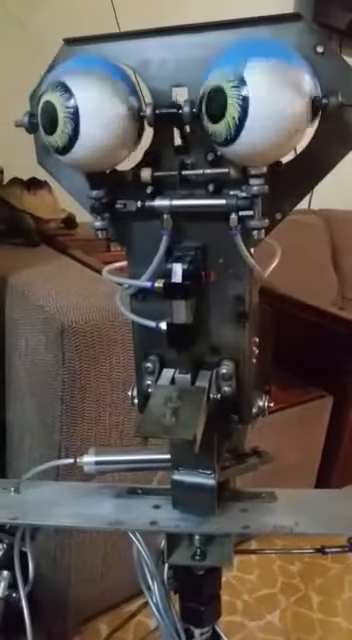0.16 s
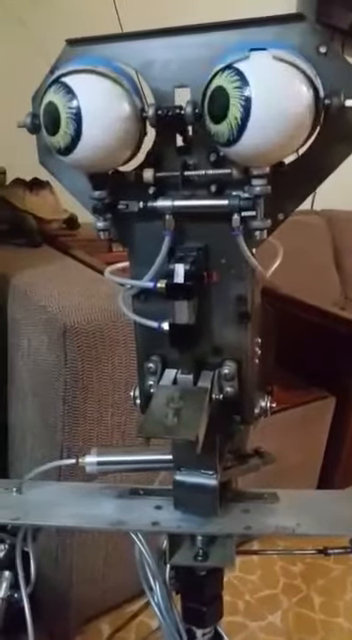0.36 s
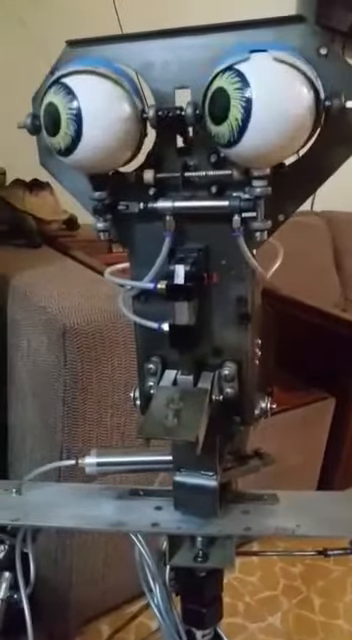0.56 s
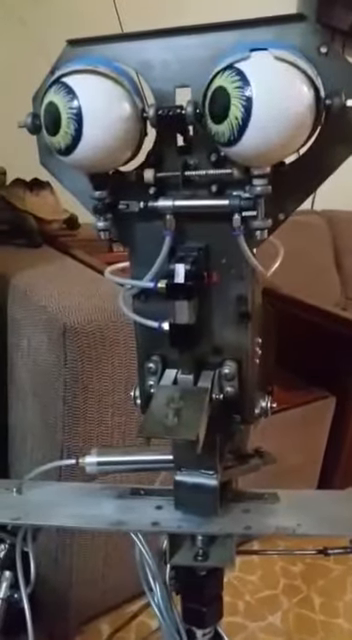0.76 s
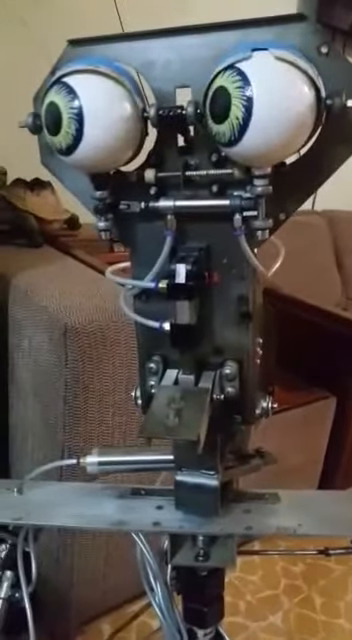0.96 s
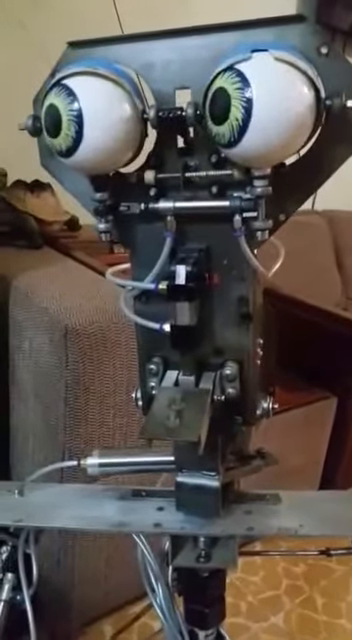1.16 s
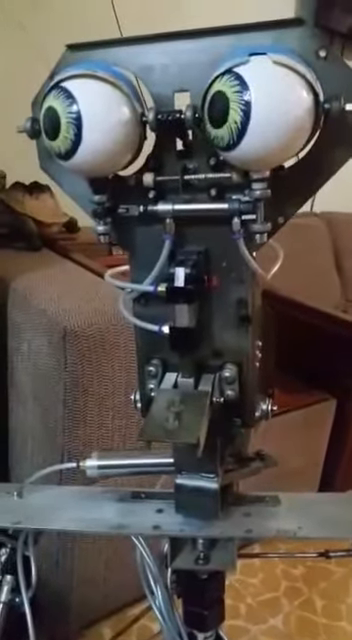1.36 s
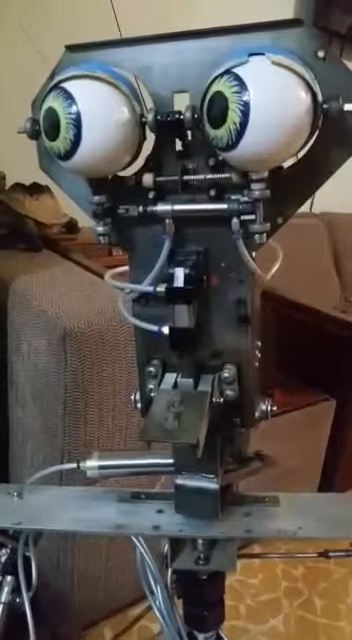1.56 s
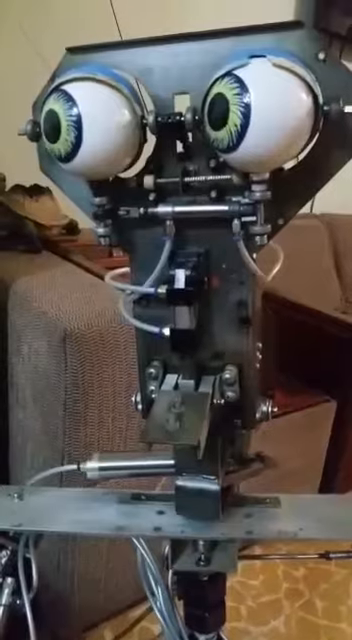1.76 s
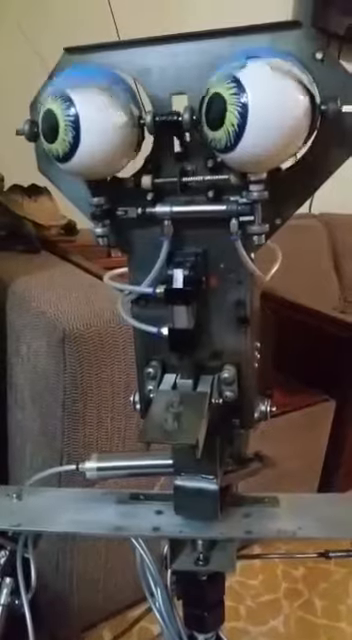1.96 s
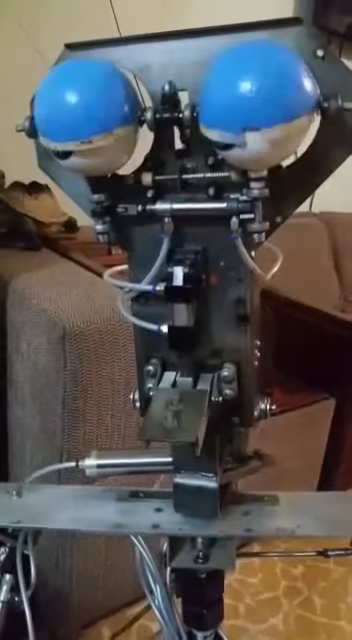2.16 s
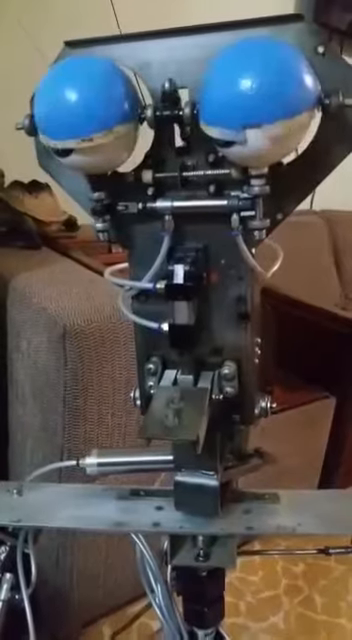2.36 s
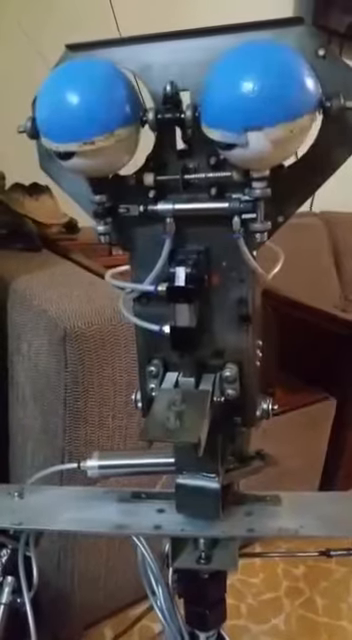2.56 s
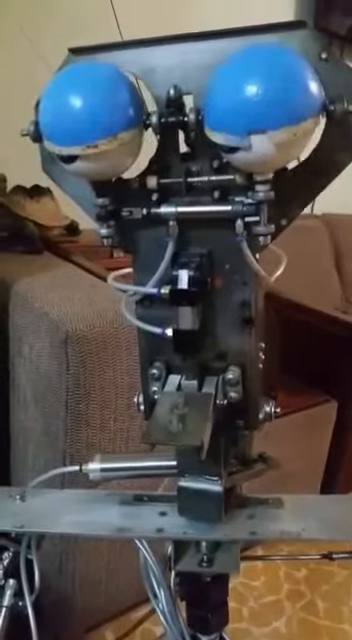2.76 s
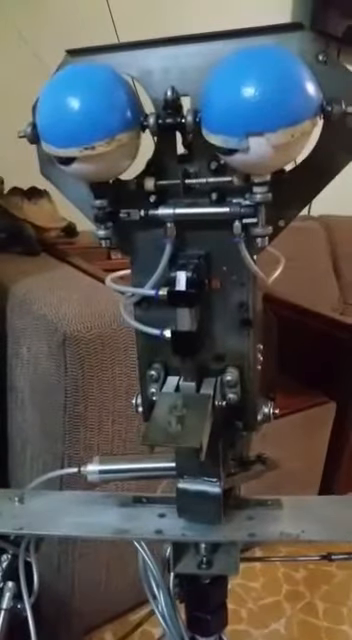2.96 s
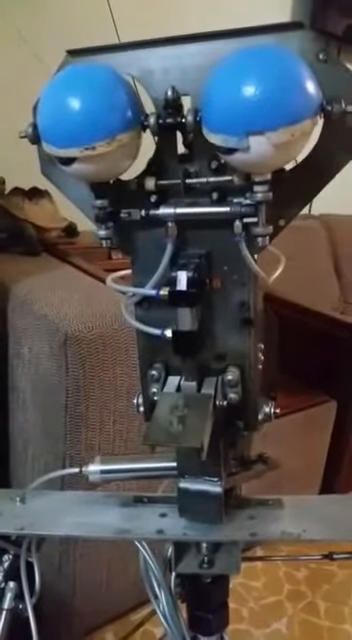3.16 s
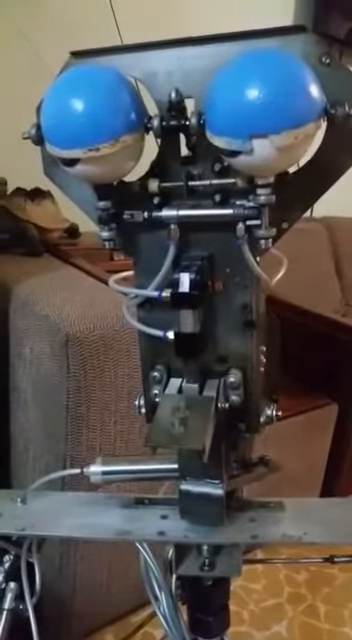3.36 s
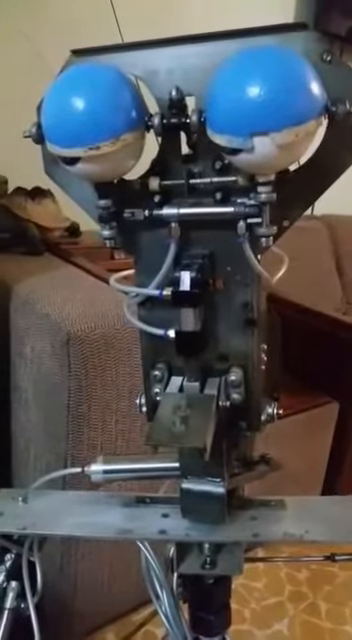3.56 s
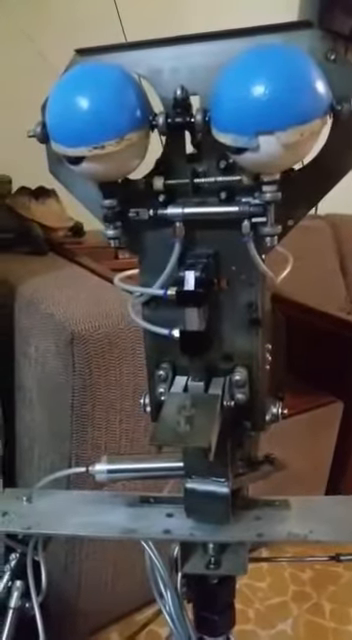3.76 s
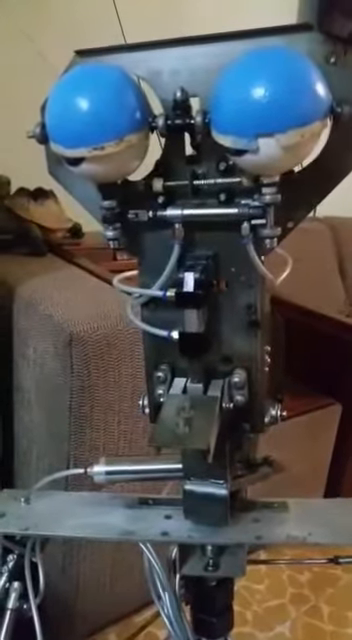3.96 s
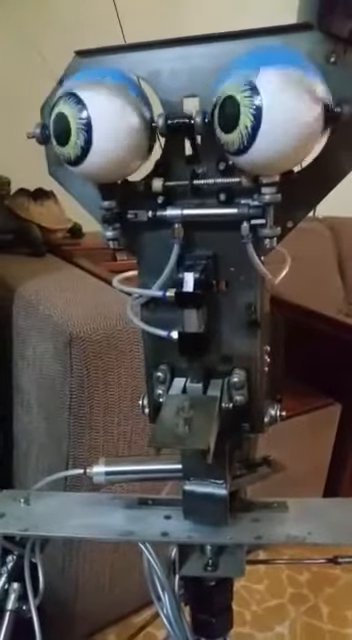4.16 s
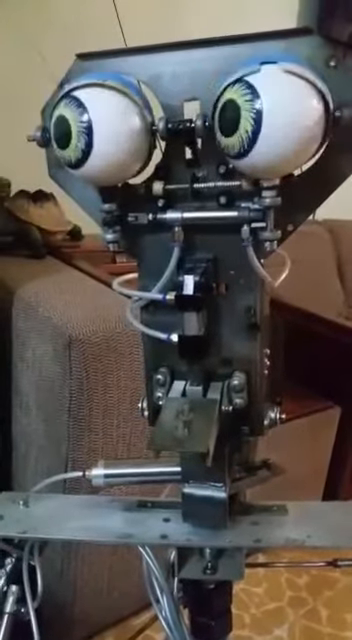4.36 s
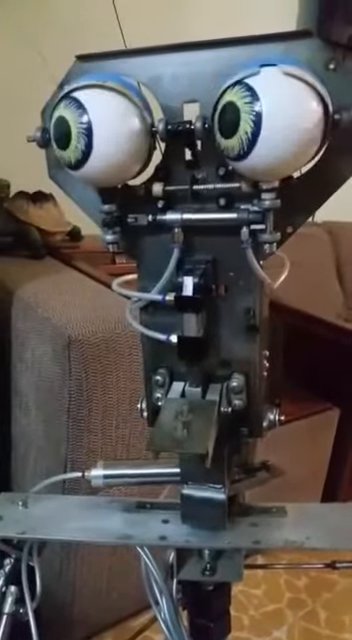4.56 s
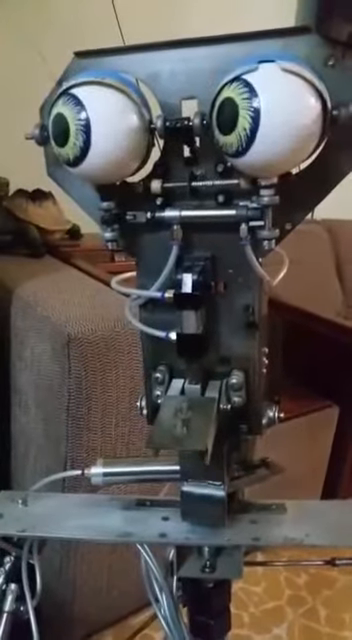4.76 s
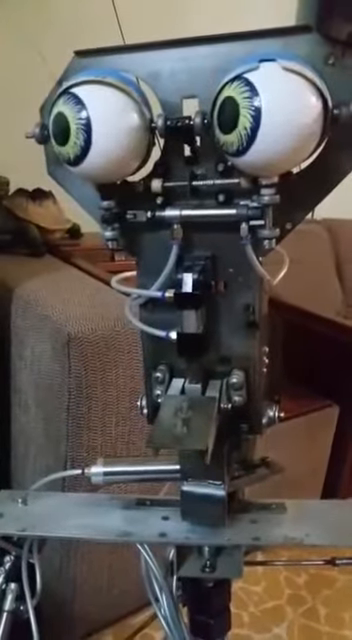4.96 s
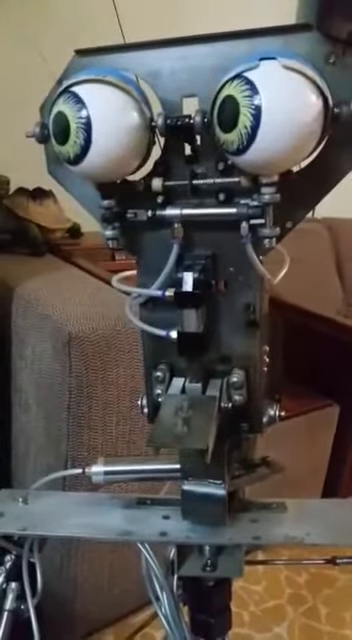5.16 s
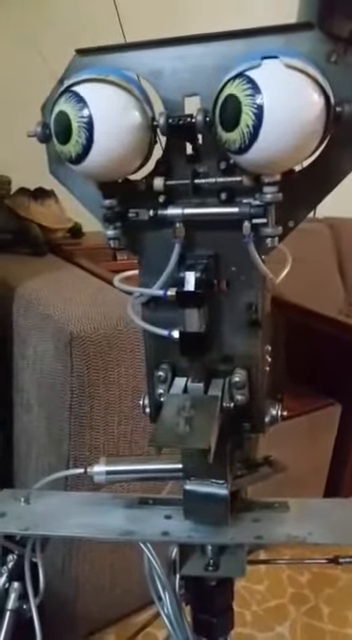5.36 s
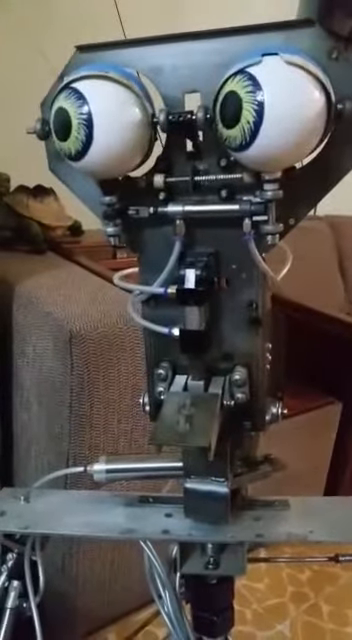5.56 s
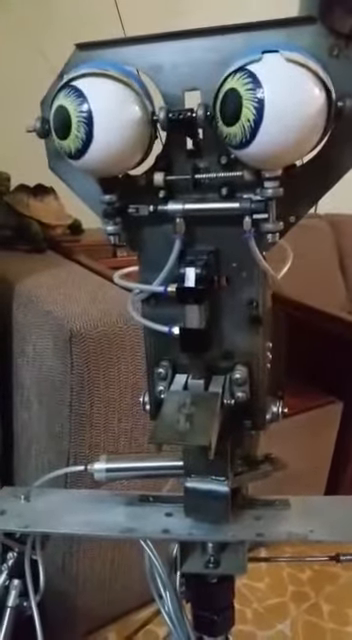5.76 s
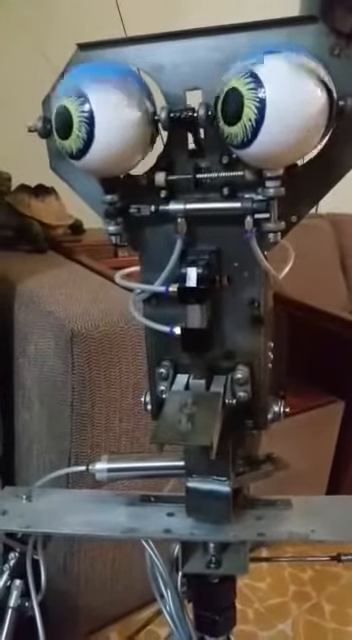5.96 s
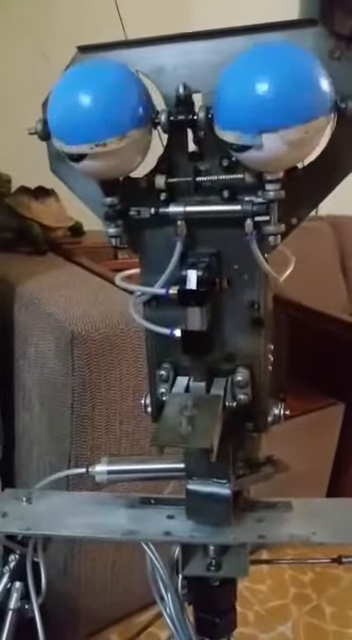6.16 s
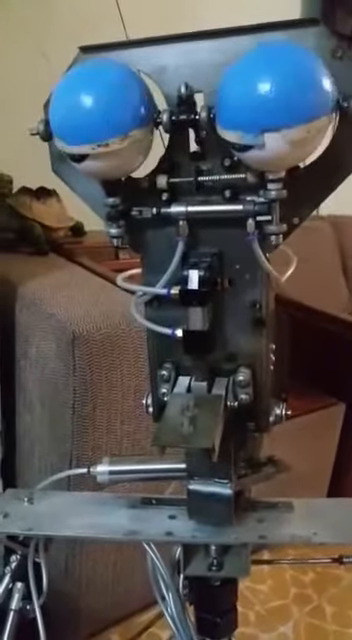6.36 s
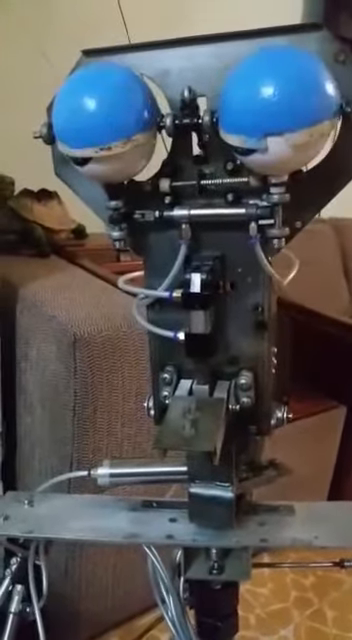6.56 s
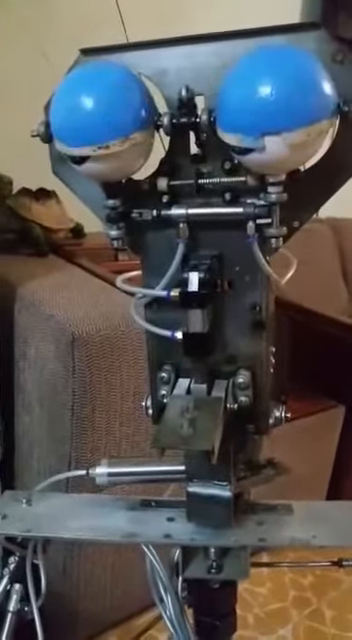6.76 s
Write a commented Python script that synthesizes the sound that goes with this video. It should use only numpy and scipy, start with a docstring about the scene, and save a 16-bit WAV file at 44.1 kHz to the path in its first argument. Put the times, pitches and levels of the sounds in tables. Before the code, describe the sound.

A pneumatic mechanical head blinks in a living room, heard close in stereo. At 0 s a low puff of air vents with a hiss; at about 0.3 s the lids crack loudly open against a metal stop, the steel frame ringing briefly and the room answering. Air seeps away over a wavering low hum, drone, rumble and soft hiss. At 1.9 s a valve ticks and exhausts with a low flutter, dull scrapes follow, and at 2.1 s the lids clack shut in a tight clatter. The background sinks, then returns by about 3 s, with faint hums and a soft knock around 3.6 s. At 3.9 s a stronger puff and low thump precede the second bright opening crack at 4.3 s. Hum and hiss linger with a faint bump at 4.8 s. A valve tick, puff and thump at 5.9 s lead to a slightly softer shutting clack at 6.1 s, then the background sinks again.

```python
"""A low puff of air opens the scene: a pneumatic animatronic head blinks in a living room, heard close up.
Valve ticks and vents are enveloped noise; the eyelids then crack against a stop as filtered bursts of
chatter and ring the steel frame as decaying sines. Room tails of shaped noise answer them.
Around this lie a wavering low sine hum, soft scrapes, low knocks and seeping air, over a noise bed of
drone, rumble and hiss that swells as the lids open, sinks after they shut and, the first time, returns."""
import sys
import numpy as np
from scipy import signal
from scipy.fft import rfft, irfft
from scipy.io import wavfile
from scipy.ndimage import uniform_filter1d

SR = 44100
rng = np.random.default_rng(int(sys.argv[2]) if len(sys.argv) > 2 else 0)


def output_pcm(signal):
    """Save a mono or channel-first signal as 16-bit PCM at the path in sys.argv[1].

    Samples are clipped to [-1, 1] before scaling.
    """
    pcm = np.clip(np.atleast_2d(signal).T, -1, 1) * 32767
    wavfile.write(sys.argv[1], SR, np.round(pcm).astype(np.int16))


N = 299880
T = np.arange(N) / SR
HZ = np.maximum(np.fft.rfftfreq(2 * N, 1 / SR), 1)  # bins of a double-length transform

# eyelids arriving at the open and the shut stop: (t/s, relative level/dB)
OPEN_HITS = [(0.2887, 6), (4.288, 6)]
SHUT_HITS = [(2.1156, 0), (6.1153, -2.5)]
# rebounds at the open stop, clatter at the shut stop: (nominal delay t/s, relative level/dB)
OPEN_BOUNCES = [(0, 0.5), (.0138, -24.5), (0.0267, -28.5)]
SHUT_BOUNCES = [(0, -3), (.0028, -0.5), (.0069, -9.5), (.0095, -8.5), (.0168, -21)]
# ringing of frame and lids: (f/Hz, t60/s, relative level/dB at the open stop, same at the shut stop)
FRAME_MODES = [(622, .25, -49, -51), (703, .35, -43, -55), (790, .28, -46, -62), (920, .18, -58, -43),
               (985, .1, -62, -51), (1105, .25, -60, -52), (1610, .08, -64, -49), (1850, .1, -56, -49),
               (1997, .12, -48, -55), (2660, .2, -49, -54), (2820, .08, -52, -53), (2950, .14, -50, -60),
               (3600, .2, -49, -58), (3826, .22, -49, -60), (3996, .08, -44, -49), (4386, .2, -48, -58),
               (4660, .14, -47, -56), (4950, .06, -43, -52)]
# tone of the crack at each stop: (f/Hz, level/dB)
OPEN_CRACK_TONE = [(100, -10), (270, -3.5), (500, -0.5), (730, 13), (1020, -6), (1500, -14.5), (2000, 1),
                   (2350, -2), (2850, 4.5), (3300, -8), (4000, 3), (5000, 0), (7200, -16.5), (10200, 0.5),
                   (13000, -5.5)]
SHUT_CRACK_TONE = [(70, -10), (160, 5.5), (400, -1), (750, -6.5), (950, 7), (1300, -10.5), (1700, -5),
                   (2300, -7), (3000, -6), (4200, -9), (5400, -6), (7800, -25.5), (10800, -8),
                   (13000, -20.5)]
# valve switchings: (t/s, tick level/dB, exhaust level/dB, exhaust delay t/s, exhaust rise t/s,
# low puff level/dB, slow bleed level/dB)
VALVE_SWITCHINGS = [(0.0, -79, -47, .001, 0.00077, -43, -65.5), (1.9107, -27, -41, .009, 0.021, -39, -85),
                    (3.911, -35, -38.5, .001, 0.0036, -36, -57.5),
                    (5.9123, -33, -40.5, .008, 0.0045, -40, -89.5)]
# tone of the spool tick, the exhaust air and the low puff: (f/Hz, level/dB)
TICK_TONE = [(100, -4.5), (400, 1.5), (1000, -14), (3000, -7), (4800, -3.5), (7000, -15.5), (10000, 1),
             (13000, 3.5)]
EXHAUST_TONE = [(200, -15.5), (700, -7), (1200, -16), (1700, -16.5), (2800, -21), (4200, -16), (6500, -21),
                (8500, -11.5), (10300, -0.5), (12700, 1.5), (14000, -8.5)]
PUFF_TONE = [(30, -24.5), (70, -4.5), (125, 4.5), (200, -11), (290, -11.5), (400, -28), (1500, -62),
             (6000, -91.5)]
# scrapes of the lid linkage on its way down: (t/s, level/dB)
LINKAGE_SCRAPES = [(2.016, -56.5), (2.038, -49.5), (2.087, -59), (6.041, -53), (6.087, -67)]
# tone of the scrape: (f/Hz, level/dB)
SCRAPE_TONE = [(150, -19.5), (450, 6.5), (680, 9.5), (1000, -6.5), (1750, -11.5), (3500, -18), (8000, -40)]
# pressure kicks of the emptying cylinder, and soft knocks: (t/s, relative level/dB)
KICKS_AND_KNOCKS = [(.562, -4), (1.940, 6.5), (3.566, -6), (3.9235, 13.5), (4.804, 1.5), (5.9225, 15.5)]
# tone of the knocks: (f/Hz, level/dB)
KNOCK_TONE = [(40, -27), (90, -4), (135, 3.5), (220, -4.5), (400, -20), (1200, -47.5), (5000, -71.5)]
# faint wisps of seeping air: (middle t/s, length t/s, level/dB)
AIR_WISPS = [(1.574, 0.83, -81), (3.288, 0.34, -85.5), (3.8, 0.34, -84.5), (5.149, 0.35, -82.5),
             (5.82, 0.5, -86)]
# room decay: (f/Hz, t60/s)
ROOM_DECAY = [(100, 0.46), (700, 0.52), (3000, 0.62), (5500, .45), (11000, .35)]
# spells of the low hum: (start t/s, end t/s, f/Hz, level/dB, level wavering/dB)
HUM_SPELLS = [(0.408, 1.022, 83, -48.5, 2), (1.033, 1.32, 82, -45.5, 0), (1.68, 2.962, 82.6, -53.5, 1),
              (2.931, 3.326, 82.3, -47, 0), (4.052, 4.295, 83.52, -44, 1), (4.345, 4.55, 83.64, -56, 3.5),
              (5.435, 5.657, 73.17, -46, 5), (6.194, 6.798, 76.33, -71, 10)]
# faint higher hums: (middle t/s, length t/s, f/Hz, peak level/dB)
HUM_OVERTONES = [(1.045, 0.34, 218.4, -62.5), (3.151, 0.4, 214, -67), (5.589, 0.27, 217.6, -62),
                 (6.55, 0.36, 133.8, -59.5)]
# tone of the background layers and of the steady floor: (f/Hz, level/dB)
DRONE_TONE = [(25, -13), (45, -12), (60, -6), (75, 3.5), (105, 6.5), (135, -12.5), (200, -39), (600, -67.5)]
RUMBLE_TONE = [(20, -15), (45, -6), (65, -3.5), (105, 0.5), (140, -6.5), (180, -11), (215, -11), (280, -19),
               (450, -22.5), (900, -46.5), (5000, -72)]
HISS_TONE = [(200, -1), (500, 7), (800, 3.5), (1250, -1.5), (1900, 3), (3100, -14), (3750, 3), (4400, 6),
             (4900, 0), (5600, -25.5), (7500, -40.5), (12500, -22)]
FLOOR_TONE = [(100, 23), (400, 6.5), (900, -8.5), (2000, -7.5), (3100, -17.5), (4300, -4), (6000, -17),
              (12000, -16)]
# moments when drone, rumble and hiss grow louder: (middle t/s, length t/s, rise in level/dB)
BACKGROUND_SURGES = [(1.206, 1, 2), (1.86, 0.3, 3.5), (3.277, .2, 2.5)]
# stereo balance of crack, room tail, air, and hum with background: (f/Hz, left minus right level/dB)
CRACK_BALANCE = [(150, -3.5), (400, 2.5), (700, -3), (2000, 8), (4100, -17.5), (7000, -6.5), (13000, 7.5)]
TAIL_BALANCE = [(150, 4.5), (700, 2), (1300, 3), (4100, -3.5), (7500, 2.5), (13000, -1)]
AIR_BALANCE = [(100, -3.5), (400, 0), (2000, -0.5), (4100, -9), (7500, -2), (10500, 3.5), (13000, -3.5)]
FLOOR_BALANCE = [(30, -13.5), (80, -4), (200, -6.5), (600, 1.5), (2200, 3), (4100, 8.5), (7500, 2.5)]

PORT_LAG_S = 0.00011  # direct crack, right channel behind left
BLEED_S = .19  # decay time constant of the slow bleed
HUM_ATTACK_S, HUM_RELEASE_S = .035, 0.049
HUM_WAVER_HZ, WAVERS_PER_S = 1.3, 11
# the background sinks after each closing, stays low, and returns
SINK_DELAY_S, SINK_FALL_S, SINK_HOLD_S, SINK_RETURN_S = 0.051, 0.38, 0.31, 0.26
# it swells while the lids travel open, and settles afterwards
OPEN_TRAVEL_S, SWELL_RISE_S, SETTLE_S = .38, .07, 0.17
# a shallow lull follows each opening; the delay runs to its middle
LULL_DELAY_S, LULL_LENGTH_S, LULL_DB = 0.9, 0.73, 2.5
# background layers: resting level, depth of the sinking, height of the swell
DRONE_DB, DRONE_SINK_DB, DRONE_SWELL_DB = -57, 18, 3
RUMBLE_DB, RUMBLE_SINK_DB, RUMBLE_SWELL_DB = -59, 8.5, 3
HISS_DB, HISS_SINK_DB, HISS_SWELL_DB = -73.5, 13.5, 8
TOP_HZ = 13100


def eyelids(contacts, crack, ring, tail, chatter_s, crack_db, ring_db, room_db, ring_room_db):
    """The lids hit a stop: a hard crack, the ring of the frame, and the room's answer to both."""
    # every contact chatters in its own way
    bursts = np.zeros((2, N))
    for s, db in contacts:
        burst = chatter(chatter_s)
        start = int(s * SR)
        bursts[:, start:start + burst.shape[1]] += undb(db) * burst
    clack = colour(bursts, crack)
    rings = convolve(blows(contacts), ring)
    direct = undb(crack_db) * clack + undb(ring_db) * rings
    # a linear phase slope delays the right channel
    lag = np.outer([0, PORT_LAG_S], HZ)
    direct = shape(direct, np.exp(-2j * np.pi * lag))
    far = convolve(undb(room_db) * clack + undb(ring_room_db) * rings, tail)
    return pan(direct, CRACK_BALANCE) + pan(far, TAIL_BALANCE)


def rebounding(stops, rebounds, scatter=0.11):
    """Every arrival at a stop bounces in much the same way, with scattered delays: (s, dB) contacts."""
    contacts = []
    for s, db in stops:
        for delay, relative_db in rebounds:
            scattered = delay * (1 + scatter * rng.standard_normal())
            contacts.append((s + scattered, db + relative_db))
    return contacts


def chatter(seconds, size=2048):
    """Metal contact breaks a blow into a brief burst with an even spectrum."""
    burst = (diffuse(apart_hz=5100) * fall(0, seconds))[:, :size]
    spectrum = rfft(burst, 2 * size)
    return irfft(spectrum / np.abs(spectrum))[:, :size]


def frame(at_open_stop):
    """Steel frame and lids ring as decaying sine modes, whose mix depends on the stop that is struck."""
    t = T[:SR]
    ring = np.zeros(SR)
    for hz, t60, open_db, shut_db in FRAME_MODES:
        strength = undb(open_db if at_open_stop else shut_db)
        ring += strength * np.sin(2 * np.pi * hz * t) * np.exp(-np.log(1000) * t / t60)
    return ring[None]


def valves(tail, tick_s=0.0033, tick_rise=.0008, vent_s=0.056, puff_s=0.063, room_db=-9,
           sputter_db=1.47, sputters_per_s=60):
    """The spool ticks; the cylinder vents with a hiss and low flutter, and a slower bleed lingers."""
    tick = vent = puff = 0
    for s, tick_db, vent_db, delay, rise, puff_db, bleed_db in VALVE_SWITCHINGS:
        opened = s + delay
        tick = tick + undb(tick_db) * fall(s, tick_s, tick_rise)
        vent = vent + undb(vent_db) * fall(opened, vent_s, rise)
        vent = vent + undb(bleed_db) * fall(opened, BLEED_S, rise)
        puff = puff + undb(puff_db) * fall(opened, puff_s, rise + 0.002)
    vent = vent * undb(sputter_db * waver(sputters_per_s))
    # the jet flutters at random but keeps an even strength
    flutter = colour(diffuse(), PUFF_TONE)
    power = uniform_filter1d(np.mean(flutter ** 2, axis=0), size=900)
    flutter = flutter / np.sqrt(power + 1e-12)
    air = tick * unit(colour(diffuse(), TICK_TONE))
    air = air + vent * unit(colour(diffuse(), EXHAUST_TONE))
    air = air + puff * flutter
    return pan(air + undb(room_db) * convolve(air, tail), AIR_BALANCE)


def linkage(tail, swell_s=0.013, fade_s=0.0077, room_db=-3):
    """Short dull scrapes of the swinging lids: noise that swells and dies within moments."""
    strength = sum(undb(db) * fall(s, fade_s, swell_s) for s, db in LINKAGE_SCRAPES)
    rub = unit(colour(diffuse(), SCRAPE_TONE)) * strength
    return rub + undb(room_db) * convolve(rub, tail)


def knocks(tail, direct_db=-1, room_db=-7):
    """Dull low bumps: single impulses through a bass-heavy filter."""
    thud = colour(blows(KICKS_AND_KNOCKS), KNOCK_TONE)
    return pan(undb(direct_db) * thud + undb(room_db) * convolve(thud, tail), AIR_BALANCE)


def seepage(opening_db=-68, rise_s=0.017, fade_s=0.18, steady_db=-106):
    """A little air seeps after each opening and in faint wisps, over a barely present steady leak."""
    openings = sum(fall(s, fade_s, rise_s) for s, _ in OPEN_HITS)
    wisps = sum(undb(db) * bell(s, length) for s, length, db in AIR_WISPS)
    flow = undb(steady_db) + undb(opening_db) * openings + wisps
    return flow * unit(colour(diffuse(), EXHAUST_TONE))


def room(build_s=.012, count=9):
    """Room tail of unit energy: noise bands that each decay at their own rate, the top dying first."""
    noise, tail = diffuse()[:, :SR], 0
    centres = np.geomspace(ROOM_DECAY[0][0], ROOM_DECAY[-1][0], count)
    log_hz = np.log(np.maximum(np.fft.rfftfreq(SR, 1 / SR), 1))
    # the bands overlap as triangles on a log-frequency axis
    for hz, share in zip(centres, np.eye(count)):
        band = irfft(rfft(noise) * np.interp(log_hz, np.log(centres), share))
        decay_s = along(ROOM_DECAY, hz) / np.log(1000)
        tail = tail + band * fall(.002, decay_s, build_s)[:SR]
    return unit(tail) / np.sqrt(SR)


def hum():
    """One low sine tone that comes and goes, wavering in level and pitch."""
    spells = np.array([undb(db) * held(start, end, HUM_ATTACK_S, HUM_RELEASE_S)
                       for start, end, _, db, _ in HUM_SPELLS]) + 1e-9
    # pitch and wavering glide towards whichever spell is strongest
    share = spells / spells.sum(axis=0)
    _, _, pitch, _, wavering = np.transpose(HUM_SPELLS)
    hz = pitch @ share + HUM_WAVER_HZ * waver(WAVERS_PER_S)
    strength = spells.max(axis=0) * undb(wavering @ share * waver(WAVERS_PER_S))
    tone = np.sin(2 * np.pi * np.cumsum(hz) / SR)
    return pan(np.sqrt(2) * strength * tone, FLOOR_BALANCE)


def overtones():
    """Faint low sine tones swell and fade above the hum."""
    return sum(undb(db) * bell(s, length) * np.sin(2 * np.pi * hz * T)
               for s, length, hz, db in HUM_OVERTONES)


def background(floor_db=-77):
    """Drone, rumble and hiss swell as the lids open, ease off, and sink after they shut, over a steady floor."""
    sink, swell = sinking(), swelling()
    lull = LULL_DB * sum(bell(s + LULL_DELAY_S, LULL_LENGTH_S) for s, _ in OPEN_HITS)
    surge = sum(db * bell(s, length) for s, length, db in BACKGROUND_SURGES)
    drift = surge - lull
    layers = [(DRONE_TONE, DRONE_DB - DRONE_SINK_DB * sink + DRONE_SWELL_DB * swell),
              (RUMBLE_TONE, RUMBLE_DB - RUMBLE_SINK_DB * sink + RUMBLE_SWELL_DB * swell),
              (HISS_TONE, HISS_DB - HISS_SINK_DB * sink + HISS_SWELL_DB * swell)]
    noise = sum(unit(colour(diffuse(), tone)) * undb(db + drift) for tone, db in layers)
    floor = undb(floor_db) * unit(colour(diffuse(), FLOOR_TONE))
    return pan(noise, FLOOR_BALANCE) + floor


def sinking():
    """0 at rest, 1 in the deep dip that follows each closing."""
    ages = np.cumsum([SINK_DELAY_S, SINK_FALL_S, SINK_HOLD_S, SINK_RETURN_S])
    return sum(np.interp(T - s, ages, [0, 1, 1, 0]) for s, _ in SHUT_HITS)


def swelling():
    """Rises to 1 while the lids travel open, falling back to 0 once they have stopped."""
    return sum(held(s - OPEN_TRAVEL_S, s, SWELL_RISE_S, SETTLE_S) for s, _ in OPEN_HITS)


def held(start, end, attack, release):
    """Envelope that rises at the start, holds, and dies away after the end."""
    return np.clip((T - start) / attack, 0, 1) * np.exp(-np.maximum(T - end, 0) / release)


def bell(middle, length):
    """Envelope that swells and fades evenly."""
    return np.exp(-(2 * (T - middle) / length) ** 2)


def fall(start, seconds, rise=0.000047):
    """Envelope that swells over the rise time and then dies away exponentially."""
    age = np.maximum(T - start, 0)
    return np.minimum(age / rise, 1) * np.exp(-np.maximum(age - rise, 0) / seconds)


def waver(rate):
    """Random wander with a spread of 1, mostly slower than the rate in Hz."""
    return unit(shape(rng.standard_normal(N), np.exp(-(HZ / rate) ** 2)))


def blows(rows):
    """One impulse for each (s, dB) row."""
    x = np.zeros(N)
    for s, db in rows:
        x[int(s * SR)] += undb(db)
    return x


def diffuse(apart_hz=1300):
    """Stereo noise: nearly alike in both channels in the bass, unrelated in the treble."""
    mid, side = rng.standard_normal((2, N))
    side = shape(side, np.minimum(.15 + HZ / apart_hz, 1))
    return unit(np.array([mid + side, mid - side]))


def pan(x, points):
    """Left-right balance that changes with frequency."""
    return shape(x, undb(np.outer([.5, -.5], along(points))))


def colour(x, points, size=4096):
    """Minimum-phase filter with the given (Hz, dB) outline."""
    hz = np.maximum(np.fft.rfftfreq(size, 1 / SR), 1)
    cepstrum = irfft(np.log(undb(along(points, hz))))
    # folding the cepstrum forward in time makes the filter causal
    cepstrum[1:size // 2] *= 2
    cepstrum[size // 2 + 1:] = 0
    return convolve(x, irfft(np.exp(rfft(cepstrum)))[None])


def convolve(x, response):
    """Pass a sound through a response with one row per channel."""
    return signal.fftconvolve(np.atleast_2d(x), response, axes=-1)[:, :N]


def shape(x, gain):
    """Apply a frequency response."""
    return irfft(rfft(x, 2 * N) * gain)[..., :N]


def along(points, hz=HZ):
    """Read (Hz, value) points on a log-frequency axis."""
    f, value = np.transpose(points)
    return np.interp(np.log(hz), np.log(f), value)


def unit(x):
    """Scale to rms 1."""
    return x / np.sqrt(np.mean(x ** 2))


def undb(db):
    """Decibels to gain."""
    return 10 ** (np.asarray(db) / 20)


def scene():
    """The lids open and shut twice in a room, over hum and background."""
    tail = room()
    opening = eyelids(rebounding(OPEN_HITS, OPEN_BOUNCES), OPEN_CRACK_TONE, frame(at_open_stop=True), tail,
                      chatter_s=0.0037, crack_db=-6.5, ring_db=-6.0, room_db=-6.5, ring_room_db=-19)
    shutting = eyelids(rebounding(SHUT_HITS, SHUT_BOUNCES), SHUT_CRACK_TONE, frame(at_open_stop=False), tail,
                       chatter_s=0.002, crack_db=4.5, ring_db=0.5, room_db=-3.5, ring_room_db=-19.5)
    machine = opening + shutting + valves(tail) + linkage(tail) + knocks(tail) + seepage()
    return machine + hum() + overtones() + background()


def record(dry):
    """A steep elliptic low-pass cuts the top of the treble."""
    steep = signal.ellip(8, .3, 60, TOP_HZ, fs=SR, output="sos")  # .3 dB ripple, 60 dB rejection
    return signal.sosfilt(steep, dry)


dry = scene()
out = record(dry)
output_pcm(out)
```